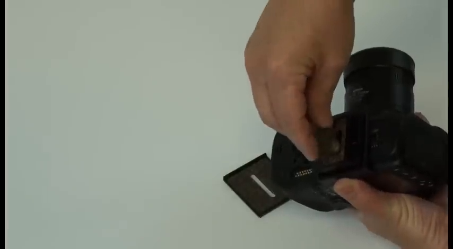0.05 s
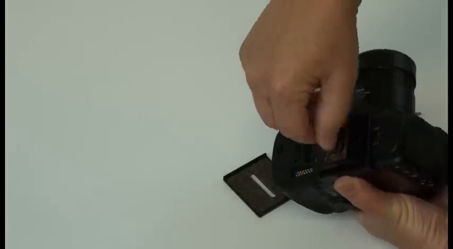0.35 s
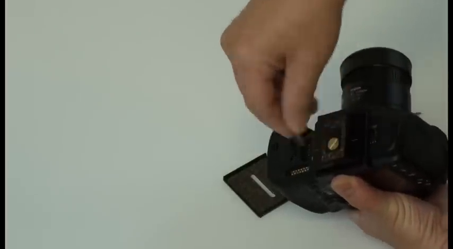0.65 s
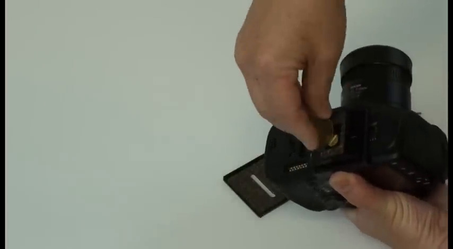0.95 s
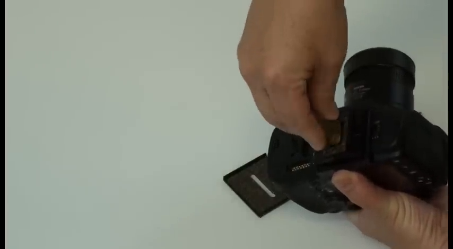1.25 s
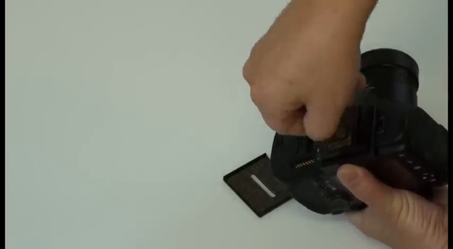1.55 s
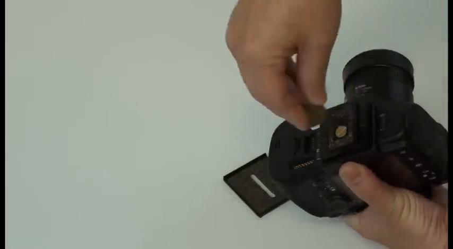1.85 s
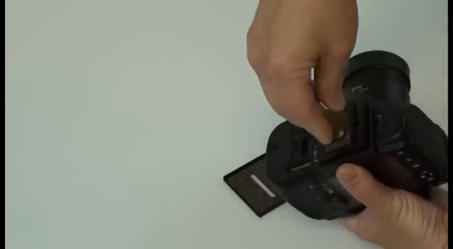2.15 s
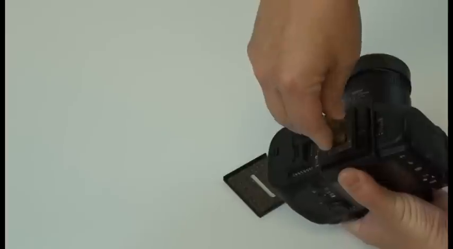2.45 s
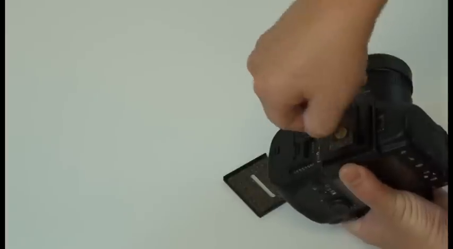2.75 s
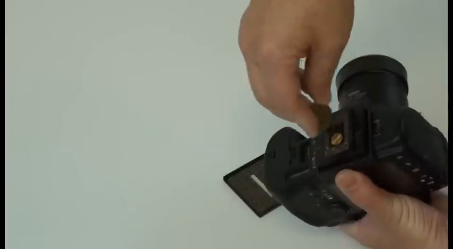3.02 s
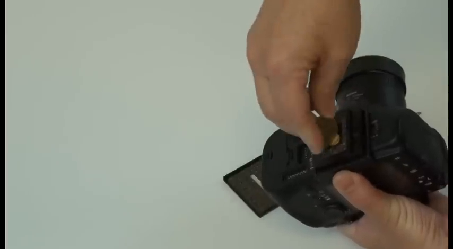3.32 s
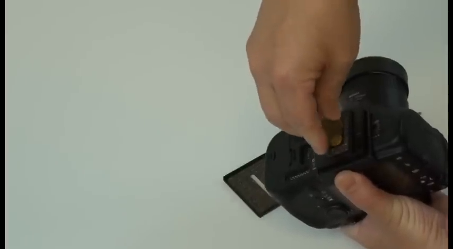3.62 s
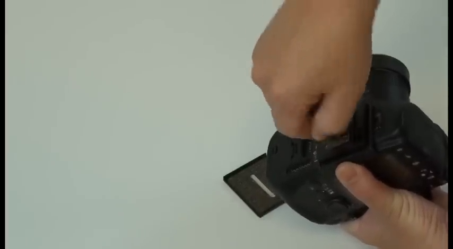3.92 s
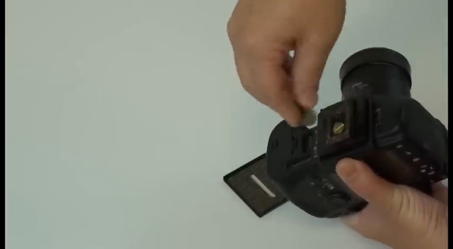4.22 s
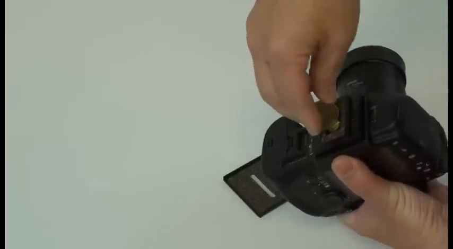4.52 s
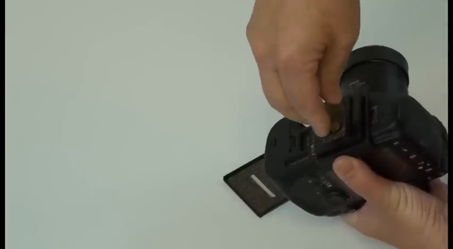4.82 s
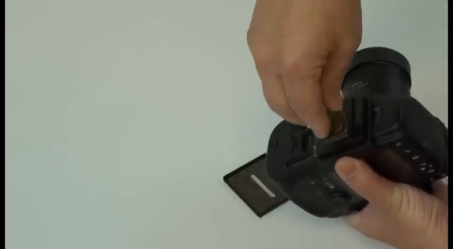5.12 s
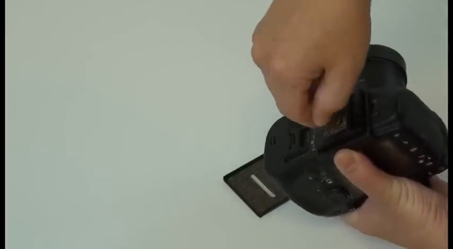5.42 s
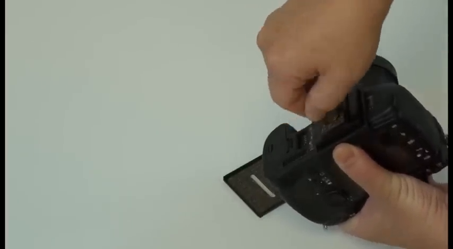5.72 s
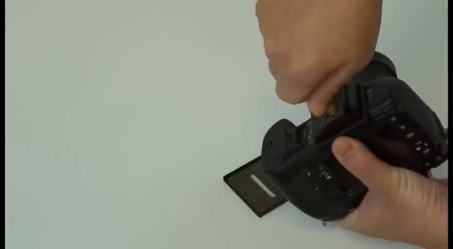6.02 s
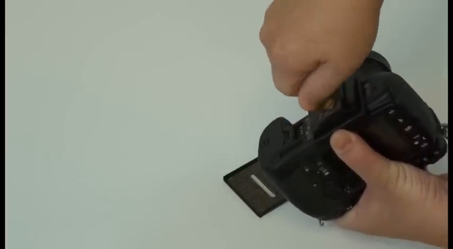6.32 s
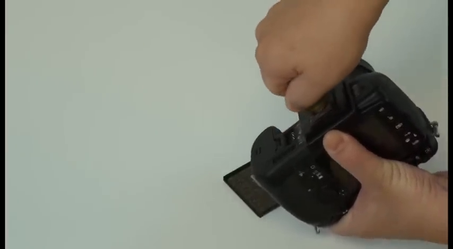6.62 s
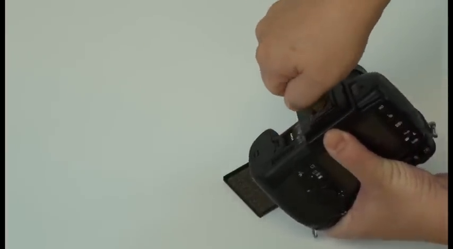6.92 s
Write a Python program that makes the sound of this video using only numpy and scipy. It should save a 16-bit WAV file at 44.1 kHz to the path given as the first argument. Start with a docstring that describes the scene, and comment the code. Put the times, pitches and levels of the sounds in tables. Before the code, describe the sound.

A coin turns a mounting screw in the base of a camera, heard close up in a small room. A low hum, swelling slightly, and a soft hiss run throughout. Faint ticks and soft bumps of the hollow camera body open the first half second. Sharper metallic clicks follow at about 1.0 and 1.3 seconds, with smaller taps until 1.8. A bright cluster comes at 2.2 to 2.4 seconds, including a tiny squeak so short that it sounds like a click. More distinct clicks land at about 3.4, 3.7, 4.5, 4.8 and 5.1 seconds, with very brief scrapes of the coin in the slot between them. Then the activity thins to a light tap at 5.8 and a faint tick at 6.8. All the clicks are small, crisp and irregular, with little echo, and fingers rub very faintly underneath.

```python
"""Turning a screw with a coin

Fingers turn a camera plate's mounting screw with a coin, half a turn at a time, above a table in a
small room. Impacts and sliding friction in the slot excite the modes of screw, plate and body.
The thread squeaks by stick-slip, the hollow body bumps softly in the hand, and skin rubs on it.
Small motors and mains hum run under it all, with a bed of room noise."""
import sys
import numpy as np
from scipy import signal
from scipy.fft import rfft, irfft
from scipy.io import wavfile
from scipy.ndimage import uniform_filter1d

SR = 44100
rng = np.random.default_rng(int(sys.argv[2]) if len(sys.argv) > 2 else 0)


def put_to_file(sound):
    """Save the sound as 16-bit audio at rate SR, in the file named by the first command-line argument."""
    columns = np.atleast_2d(sound).T  # one column per channel
    safe = np.clip(columns, -1, 1)
    whole_steps = np.round(safe * 32767)
    wavfile.write(sys.argv[1], SR, whole_steps.astype(np.int16))


N = 311081
T = np.arange(N) / SR
PLATE_HZ = 3190  # the plate's main resonance


def coin_knocks(spot_db=11, spot_octaves=0.45, thrust_octaves=1.56, low_hz=850):
    """Impact excitation: hardness tilts the treble, thrust drives the shell, the part struck rings most."""
    # blows of the coin in the slot: start_s, strength_db, hardness_db_per_octave, thrust_db, spot_hz
    knocks = [(0.0785, -51.0, -1, -0.5, 3300), (0.277, -55.0, 9.0, -12, 1400),
              (0.297, -56.5, 3.0, 0.5, 1400), (0.441, -47.5, -4.5, -6.0, 7900),
              (0.4952, -73.5, 16.0, 10.0, 4000), (1.006, -32, -8.5, -11, 10100), (1.2276, -49, -7, 3, 2700),
              (1.2351, -45.0, 3.0, 4, 2680), (1.3267, -34.5, -2.5, 1.5, 7950),
              (1.3504, -48.5, 3.5, -0.5, 12600), (1.5766, -47.5, -4, 1, 2660),
              (1.5921, -49.0, -2.5, 4.5, 12600), (1.6767, -47.5, -5.0, -12.0, 10100),
              (1.8436, -59.5, 4, 8.5, 1950), (2.2021, -33.5, -4.5, -6, 12600), (2.281, -48, -14.5, 4, 5830),
              (2.331, -43, -4, -3.5, 2300), (2.3383, -28.5, 2.0, -10, 12300), (2.3653, -52, 6, 9, 4000),
              (2.384, -45, -5, 8, 4000), (2.7204, -57.5, -9.0, 9.5, 12600), (2.8375, -54.5, 8, 1.5, 3370),
              (3.365, -38.5, -18, -4.5, 8700), (3.422, -31.0, -5.5, -12.5, 12500),
              (3.6969, -42, 4.5, 7.5, 6300), (4.0026, -42.5, -14, -1, 10100),
              (4.1076, -47.0, 4.0, -30, 1950), (4.5246, -26.5, -5.0, -12.5, 9300),
              (4.8247, -32.5, 5.5, -3, 1950), (5.1053, -36.5, -3.5, -3.5, 7100),
              (5.2725, -71.5, 14.5, 10, 6300), (5.8404, -43, -3.5, -6.5, 1390),
              (5.8613, -65.0, 12.5, 18.0, 4000), (6.781, -51.5, 0.5, -12, 1410)]
    # bands of shell, base, plate, screw, coin, coin rim and contact tick: low_hz, high_hz
    parts = [(900, 1700), (1700, 2850), (2850, 3650), (3650, 6200), (6200, 8000), (8000, 11000),
             (11000, 15000)]
    # each part's share of an average knock: level_db
    part_db = [-7.5, -2, -0.95, -1.44, -6.5, -8.5, -19.5]
    # reflections off surfaces near the camera: delay_s, gain_db
    surfaces = [(.00368, -3), (.0044, -8), (.0083, -12)]
    out, t = np.zeros(N), np.arange(3072) / SR
    f = np.fft.rfftfreq(len(t), 1 / SR)
    octaves = np.log2(np.sqrt(np.prod(parts, axis=1)) / PLATE_HZ)
    above, below = np.maximum(octaves, 0), np.maximum(-octaves, 0) / thrust_octaves
    for start_s, strength_db, hardness, thrust_db, spot_hz in knocks:
        hit = impact(t)
        for delay_s, db in surfaces:  # each direction radiates its own mix of the modes
            hit = hit + undb(db) * np.pad(impact(t), (int(delay_s * SR), 0))[:len(t)]
        nearness = np.exp(-((octaves - np.log2(spot_hz / PLATE_HZ)) / spot_octaves) ** 2)
        levels_db = strength_db + np.array(part_db) + spot_db * nearness
        levels_db += hardness * above + thrust_db * below
        # a part's level is its energy spread over 10 ms
        power = np.abs(rfft(hit)) ** 2 * 2 / len(t) / (SR / 100)
        band_gains = []
        for (lo, hi), db in zip(parts, levels_db):
            gain_db = db - 10 * np.log10(power[(f > lo) & (f < hi)].sum())
            band_gains += [(lo * 1.06, gain_db), (hi / 1.06, gain_db)]
        add(out, start_s, coloured(hit, band_gains))
    radiation = signal.butter(3, low_hz, "high", fs=SR, output="sos")  # small parts radiate no bass
    return signal.sosfilt(radiation, out)


def impact(t, crack_db=-4, crack_s=0.0011, chatter_db=-14, chatter_s=0.022):
    """Impulse response of the assembly: a contact crack, free vibration and the chatter of loose parts."""
    # modes of the whole assembly: frequency_hz, t60_s, level_db
    modes = [(1138, 0.02, -10.5), (1369, 0.018, -6), (1927, 0.014, -4.5), (2540, 0.014, -2.5),
             (2690, 0.019, -4.5), (2934, 0.015, -4), (3320, 0.0074, 4.5), (4047, 0.032, -12),
             (4555, 0.027, -9.5), (4974, 0.032, -11.5), (5880, 0.014, -10), (6375, 0.023, -7),
             (7030, 0.016, -3), (7260, 0.0044, -16), (7570, 0.012, -1), (8070, 0.0087, -8.5),
             (8560, 0.0033, -2.5), (10400, 0.0055, -25), (11300, 0.0034, -3)]
    # spectrum of the contact noise: frequency_hz, gain_db
    contact_colour = [(300, -33), (800, -26), (1250, -12), (1650, -16), (2100, 8.5), (3350, 3.5),
                      (3750, 6.5), (7200, 2.5), (10000, 1.5), (11450, -3.5), (12600, 10), (14500, -16)]
    crack, chatter = rng.standard_normal((2, len(t)))
    contact = undb(crack_db) * unit_energy(crack * np.exp(-t / crack_s))
    contact += undb(chatter_db) * unit_energy(chatter * np.exp(-t / chatter_s))
    return unit_energy(ring(t, modes)) + coloured(contact, contact_colour)


def ring(t, modes, scatter_db=2, detune=0.002):
    """Modal superposition: damped sinusoids, varied a little by the grip and the point of contact."""
    hz, t60_s, db = np.transpose(modes)
    size, shift = rng.standard_normal((2, len(hz)))
    gain = undb(db + scatter_db * size) * rng.choice([-1, 1], len(hz))
    phase = 2 * np.pi * np.outer(hz * (1 + detune * shift), t)
    return gain @ (np.sin(phase) * undb(-60 * t / t60_s[:, None]))


def coin_scrapes(grain_db=5, base_width_hz=2000, hiss_db_per_doubling=14):
    """Sliding friction: dense, tiny slips drive the plate's resonance and hiss at the coin's edge."""
    # slides of the coin on the screw head: start_s, length_s, level_db, relative_hiss_db
    slides = [(0.588, 0.02, -47.5, -6.5), (1.129, 0.0084, -42.5, -29), (1.301, 0.025, -52, -9),
              (1.513, 0.032, -56, -8), (2.35, 0.015, -46, 7), (3.676, 0.024, -45, -9),
              (3.911, 0.05, -60, -14), (4.061, 0.0087, -58.5, 6), (4.081, .008, -54, 1),
              (4.101, 0.0066, -51, 0), (4.54, 0.049, -62, -7), (4.629, .02, -49.5, -11),
              (4.806, 0.023, -50, -15), (5.074, .03, -54, 0.5), (6.787, .015, -58, 3)]
    out = np.zeros(N)
    for start_s, length_s, db, hiss_db in slides:
        slip, size = rng.standard_normal((2, 4096))
        slips = slip * undb(grain_db * size)
        # a sharper edge excites a wider band of the plate
        width_hz = base_width_hz * 2 ** (hiss_db / hiss_db_per_doubling)
        stretch = 1 + width_hz / PLATE_HZ / 2
        plate = unit_rms(band(slips, PLATE_HZ / stretch, PLATE_HZ * stretch))
        hiss = undb(hiss_db) * unit_rms(band(slips, 1800, 8400))
        n = min(int(length_s * SR), len(slips))
        add(out, start_s, undb(db) * (plate + hiss)[-n:] * signal.windows.tukey(n, 0.7))
    return out


def thread_squeaks(wobble=0.043):
    """Stick-slip oscillation: friction locks roughly onto one metal mode for a few milliseconds."""
    # squeaks of the screw thread: start_s, length_s, pitch_hz, level_db
    squeaks = [(1.33, 0.0046, 7000, -34.5), (1.328, 0.011, 5900, -39.5), (2.341, 0.0065, 5100, -27),
               (2.366, 0.0072, 6800, -35.5), (2.728, 0.02, 3850, -60.5), (3.698, 0.0077, 6920, -29.5)]
    out = np.zeros(N)
    for start_s, length_s, pitch_hz, db in squeaks:
        n = int(length_s * SR)
        jitter = unit_rms(uniform_filter1d(rng.standard_normal(2048), size=16))[:n]
        phase = 2 * np.pi * np.cumsum(pitch_hz * (1 + wobble * jitter)) / SR
        add(out, start_s, undb(db) * unit_rms(np.sin(phase) * np.hanning(n)))
    return out


def body_bumps(push_s=0.0026):
    """Damped resonance: a soft, uneven push rings the hollow body while the hand damps it."""
    # shifts of the held camera against the table: start_s, level_db
    bumps = [(.281, -47), (.298, -47), (.458, -48), (1.593, -44.5), (2.617, -53), (2.722, -53.5),
             (4.825, -47), (5.106, -47)]
    # resonances of the hollow body: frequency_hz, t60_s, level_db
    hollow_modes = [(390, 0.026, 0), (500, 0.02, 0), (594, 0.033, 2.5)]
    out, t = np.zeros(N), np.arange(4096) / SR
    for start_s, db in bumps:
        push = rng.standard_normal(len(t)) * np.exp(-t / push_s)
        body = signal.fftconvolve(push, ring(t, hollow_modes))
        add(out, start_s, undb(db) * unit_energy(band(body, 286, 1130)))
    return out


def skin_friction(grip_db=-58, rub_db=-66, tighten_s=5.8, tighten_db=-67.5, uneven_db=2):
    """Friction noise: the palm rumbles unevenly on the body and the fingertips whisper."""
    palm_db = grip_db - 2.5 * T  # falls as the hold settles
    palm = unit_rms(band(rng.standard_normal(N), 43, 334)) * undb(palm_db)
    # the fingertips quieten as the screw runs in, then press on the coin for the last, tight turn
    tips_db = uniform_filter1d(np.where(T < tighten_s, rub_db - 1.6 * T, tighten_db), size=SR // 3)
    tips = unit_rms(band(rng.standard_normal(N), 1100, 3300)) * undb(tips_db)
    return (palm + tips) * undb(uneven_db * wander(14))


def room(x, early_db=-12, early_s=0.011, tail_db=-15.5, t60_s=0.35, spread=0.21):
    """Reverberation: direct sound, scatter off the table and a diffuse tail reach two microphones."""
    # balance between the microphones: frequency_hz, left_over_right_db
    balance = [(1300, -1), (2400, 1), (4400, 3), (8500, 1), (12500, -2.5)]
    t = np.arange(SR // 2) / SR
    shared, left, right, tail_left, tail_right = rng.standard_normal((5, len(t)))
    out = []
    for share, own, diffuse in [(0.3, left, tail_left), (-0.665, right, tail_right)]:
        early = (shared + spread * own) * np.exp(-t / early_s) * (t > 0.0036)
        tail = band(diffuse, 200, 12000, order=1) * undb(-60 * t / t60_s) * (t > 0.008)
        response = undb(early_db) * early / np.linalg.norm(early)
        response += undb(tail_db) * tail / np.linalg.norm(tail)
        response[0] += 1  # direct path
        response = coloured(response, [(hz, share * db) for hz, db in balance])
        out.append(signal.fftconvolve(x, response)[:N])
    return np.array(out)


def hum(waver_db=0.5, drift_rad=0.28, drone_hz=58.96):
    """Beating: motor and mains tones of nearby frequency interfere, each wavering in level and phase."""
    # motor and mains tones: frequency_hz, rms_db
    tones = [(36.0, -62.5), (37.85, -70.5), (116.46, -64.5), (120, -63), (176.8, -69.5), (228, -65.5),
             (232.9, -68.5), (240, -66.5), (276, -77.5), (839.7, -75.5)]
    # swell and fall of the low drone: time_s, rms_db
    drone_levels = [(0, -60), (.33, -47), (1.6, -52.5), (2.6, -57.5), (3.3, -51), (4, -56.5), (5.2, -53.5),
                    (6.6, -53.5), (7.05, -63)]
    drone_gain = undb(np.interp(T, *np.transpose(drone_levels)))
    lines = [(hz, undb(db)) for hz, db in tones] + [(drone_hz, drone_gain)]
    out = np.zeros(N)
    for hz, gain in lines:
        amplitude = np.sqrt(2) * gain * undb(waver_db * wander(3.6))
        phase = 2 * np.pi * (hz * T + rng.random()) + drift_rad * wander(1.99)
        out += amplitude * np.sin(phase)
    return out


def air(level_db=-51.5, top_hz=13900):
    """Partial coherence: room noise is alike in both channels in the bass; microphone hiss lies above."""
    # spectrum of the background noise: frequency_hz, relative_density_db
    spectrum = [(20, -36), (40, -5.5), (52, -3.5), (66, -12), (85, -10), (112, -8.5), (140, -13),
                (205, -11.5), (310, -16.5), (450, -19), (850, -21), (1800, -24.5), (3530, -30),
                (13500, -39)]
    # likeness of left and right: frequency_hz, correlation
    likeness = [(60, 0.99), (130, 0.99), (290, 0.88), (640, 0.065), (1400, 0.017), (3100, 0.049),
                (7000, 0.13), (13000, 0.51)]
    f = np.arange(N // 2 + 1) * SR / N
    colour = undb(over_hz(spectrum, f)) / np.sqrt(1 + (f / top_hz) ** 120)
    correlation = np.clip(over_hz(likeness, f), 0, 1)
    mid = irfft(rfft(rng.standard_normal(N)) * colour * np.sqrt(1 + correlation), N)
    side = irfft(rfft(rng.standard_normal(N)) * colour * np.sqrt(1 - correlation), N)
    return unit_rms(np.array([mid + side, mid - side])) * undb(level_db)


def undb(db):
    """Decibels to amplitude ratio."""
    return 10 ** (np.asarray(db) / 20)


def unit_rms(x):
    """Normalise to rms 1."""
    return x / np.sqrt(np.mean(x ** 2))


def unit_energy(x):
    """Normalise a transient to the energy of 10 ms at rms 1."""
    return x / np.sqrt(np.sum(x ** 2) / (SR / 100))


def band(x, lo_hz, hi_hz, order=2):
    """Causal band-pass filter."""
    return signal.sosfilt(signal.butter(order, [lo_hz, hi_hz], "band", fs=SR, output="sos"), x)


def over_hz(points, f):
    """Interpolate (frequency_hz, value) points on a logarithmic frequency axis."""
    hz, value = np.transpose(points)
    return np.interp(np.log(f + 1), np.log(hz), value)


def coloured(x, points):
    """Minimum-phase filter through (frequency_hz, gain_db) points; it keeps an attack sharp."""
    n = len(x)
    gain = undb(over_hz(points, np.arange(n // 2 + 1) * SR / n))
    cepstrum = irfft(np.log(gain), n)
    cepstrum[1:n // 2] *= 2  # folding onto positive time makes the filter causal
    cepstrum[n // 2 + 1:] = 0
    return irfft(rfft(x) * np.exp(rfft(cepstrum)), n)


def wander(rate_hz):
    """Smoothed random steps with a standard deviation near 1."""
    k = int(SR / rate_hz)
    steps = np.repeat(rng.standard_normal(N // k + 1), k)
    return 1.25 * uniform_filter1d(uniform_filter1d(steps, k), k)[:N]


def add(track, start_s, x):
    """Superpose x on the track from start_s."""
    i = int(start_s * SR)
    track[i:i + len(x)] += x[:N - i]


def scene():
    """Superposition: the handling sounds reverberate in the room, over hum and air."""
    handling = coin_knocks() + coin_scrapes() + thread_squeaks() + body_bumps() + skin_friction()
    return room(handling) + hum() + air()


def record(dry):
    """Band limiting: a steep low-pass filter cuts the treble above 15 kHz."""
    return signal.sosfilt(signal.ellip(8, 0.2, 70, 15000, fs=SR, output="sos"), dry)


dry = scene()
out = record(dry)
put_to_file(out)
```